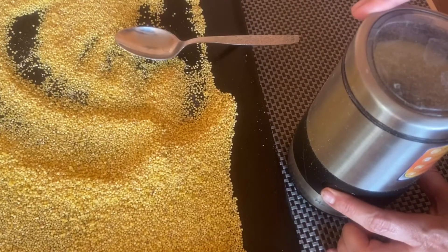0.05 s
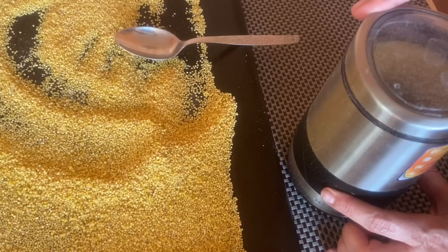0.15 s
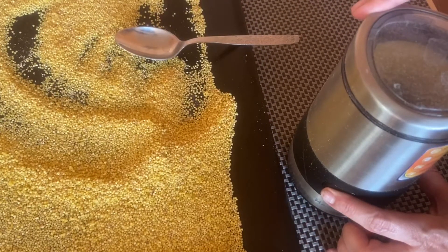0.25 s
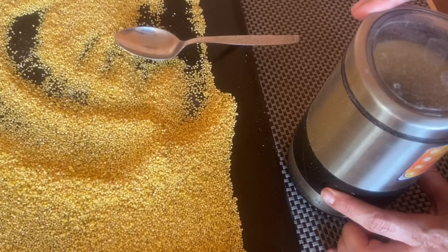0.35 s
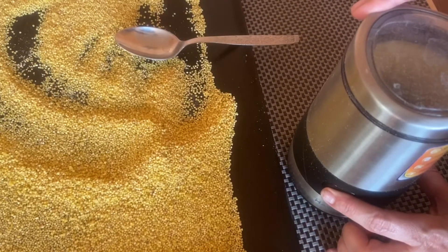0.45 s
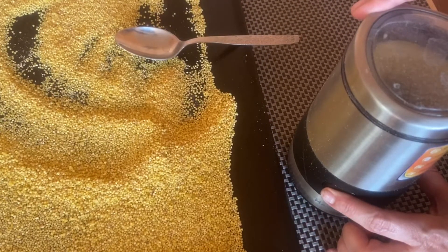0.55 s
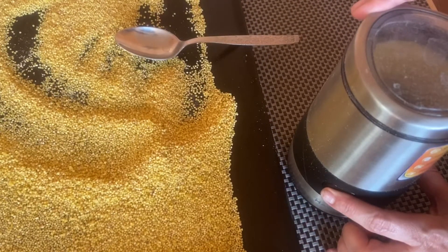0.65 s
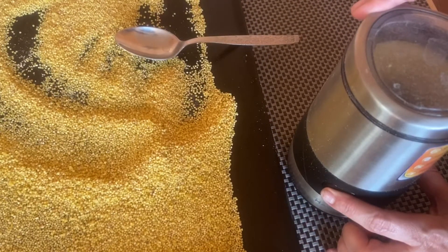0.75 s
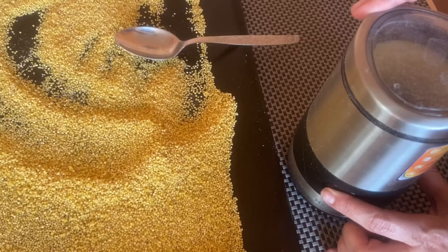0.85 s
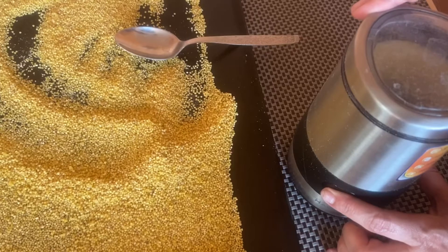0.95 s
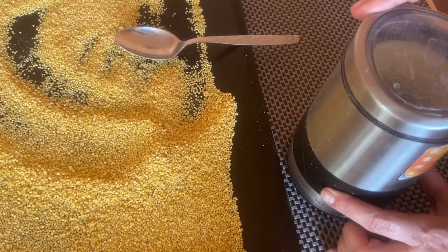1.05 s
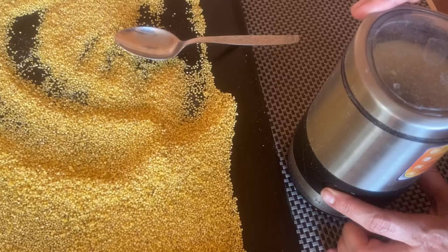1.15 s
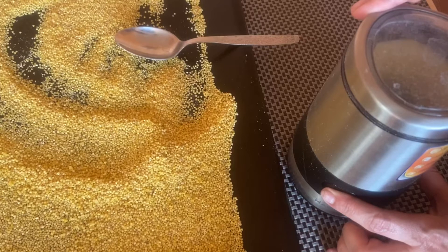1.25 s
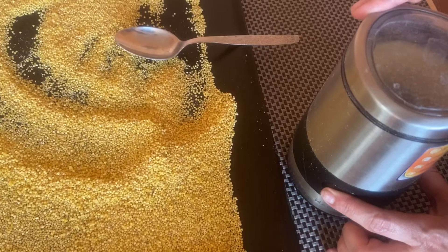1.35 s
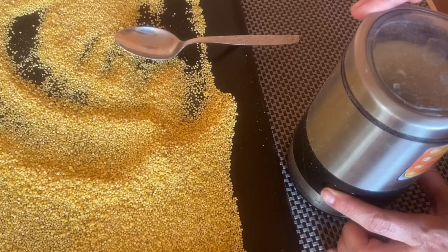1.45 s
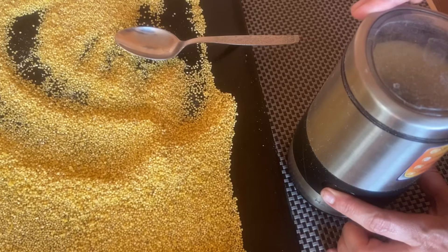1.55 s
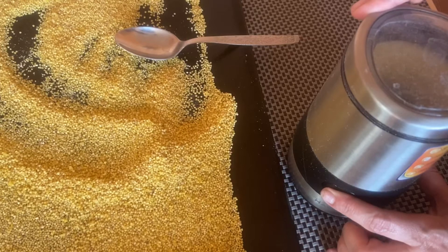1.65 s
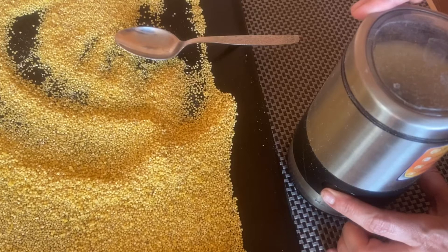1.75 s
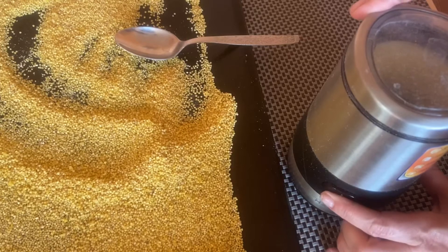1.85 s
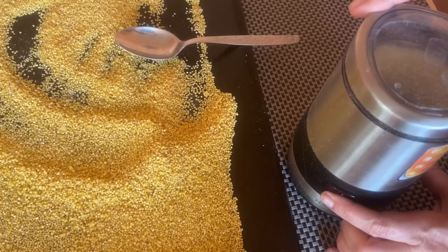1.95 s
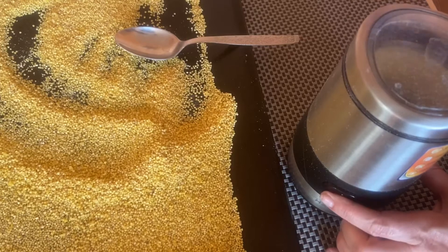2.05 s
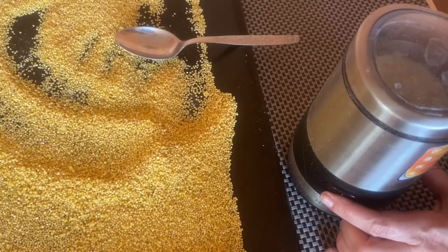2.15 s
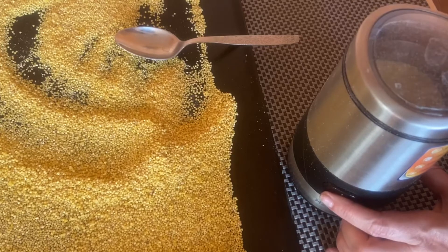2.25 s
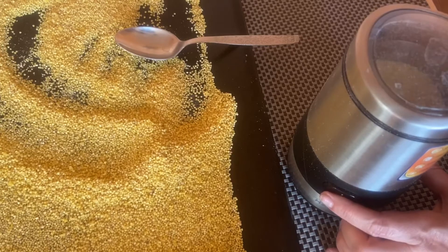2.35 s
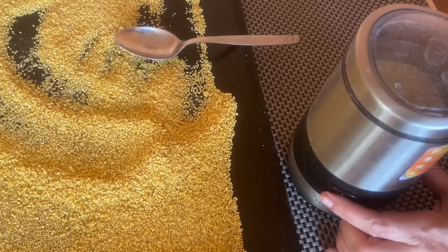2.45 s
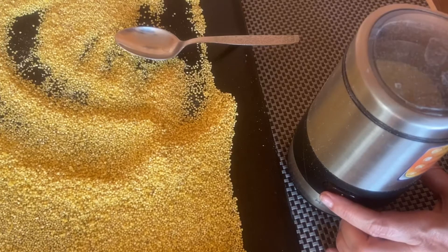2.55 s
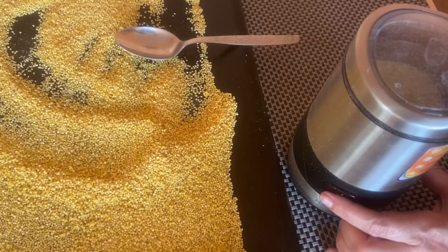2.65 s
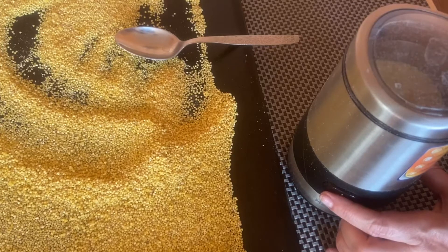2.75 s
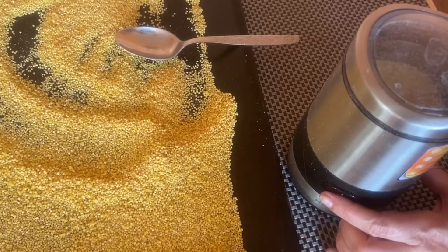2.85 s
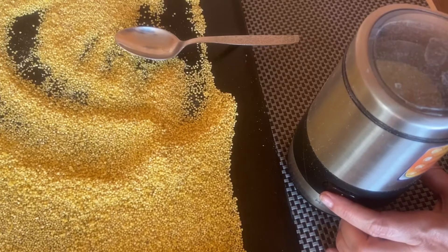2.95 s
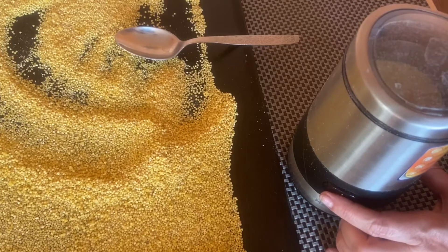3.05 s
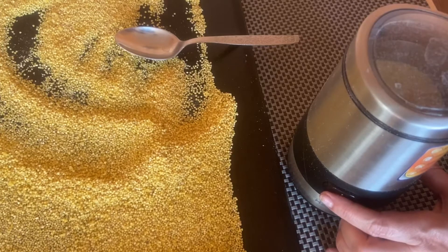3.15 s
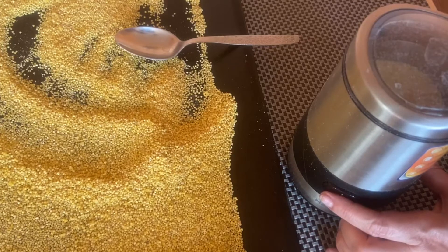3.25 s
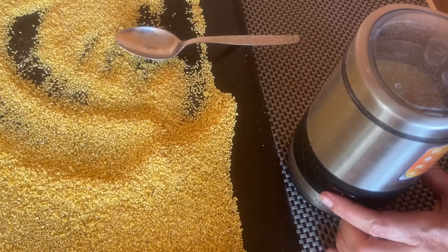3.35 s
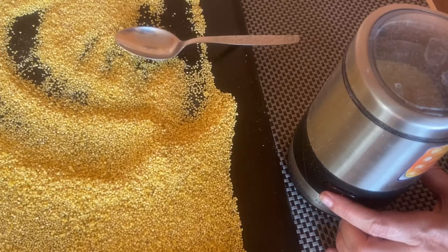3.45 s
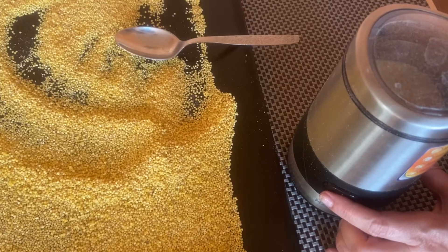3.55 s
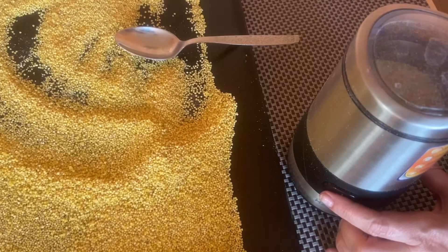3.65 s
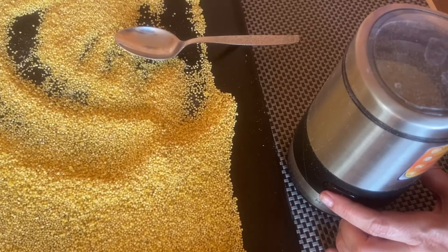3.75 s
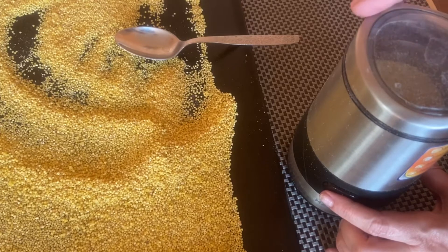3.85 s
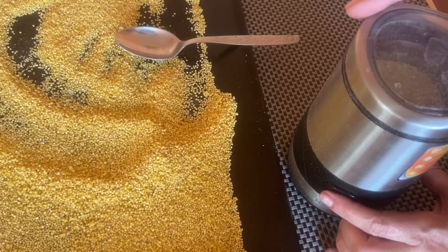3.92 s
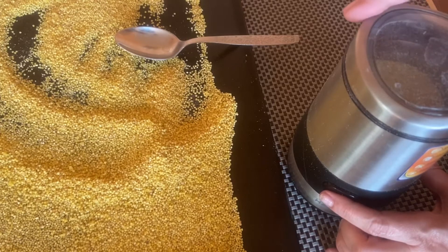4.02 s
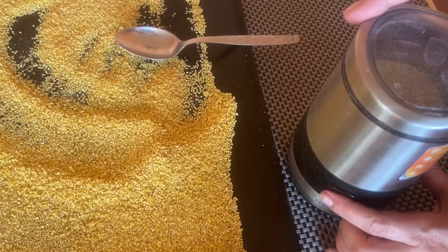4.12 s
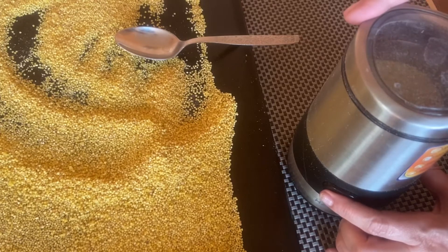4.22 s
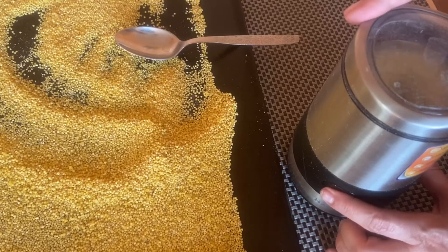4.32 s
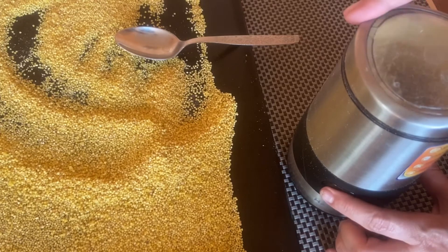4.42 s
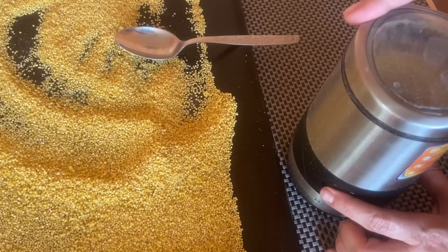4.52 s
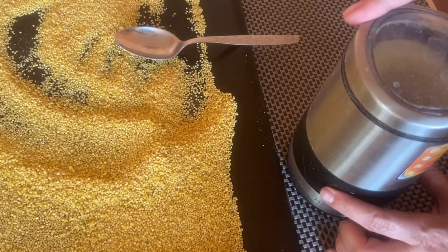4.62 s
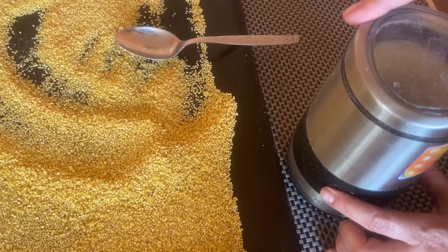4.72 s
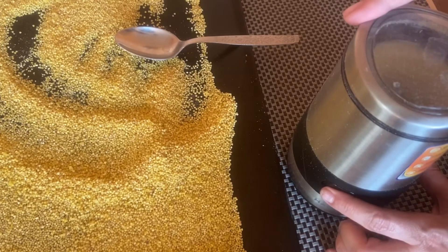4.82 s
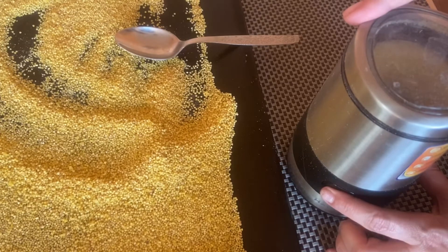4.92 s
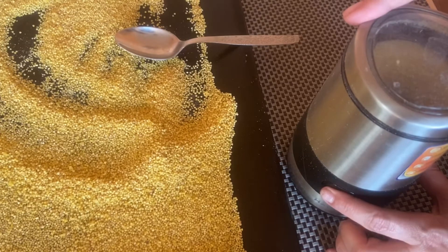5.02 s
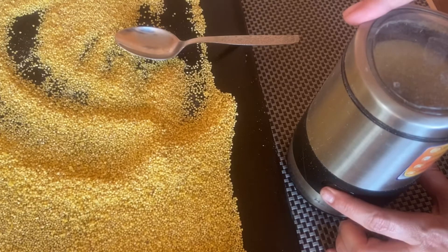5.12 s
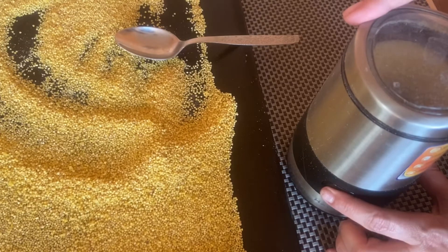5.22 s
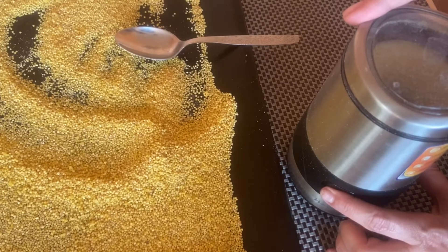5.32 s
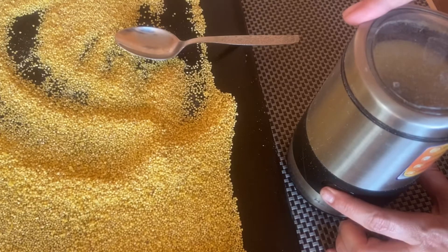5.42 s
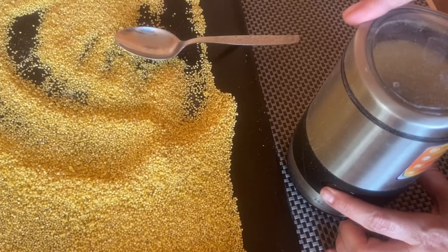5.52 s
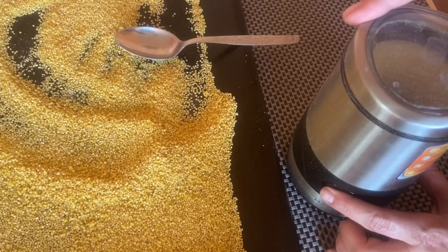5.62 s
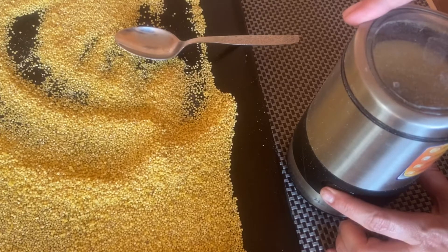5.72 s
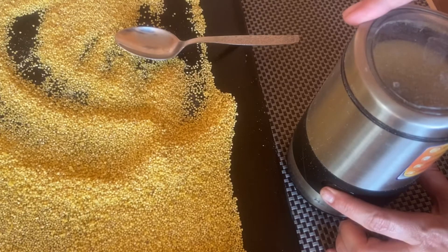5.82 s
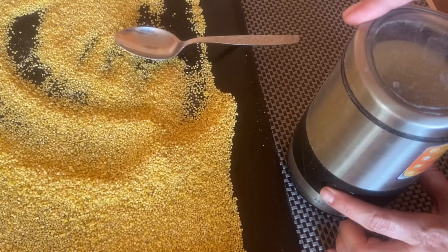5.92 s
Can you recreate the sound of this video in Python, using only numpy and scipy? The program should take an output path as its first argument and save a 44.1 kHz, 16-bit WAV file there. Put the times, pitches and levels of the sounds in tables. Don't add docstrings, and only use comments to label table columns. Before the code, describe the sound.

Loud gritty whirring of a grain grinder winds down with a clatter, leaves a quiet kitchen hush, then restarts abruptly and keeps running.

```python
import sys
import numpy as np
from scipy import signal
from scipy.fft import rfft, irfft, next_fast_len
from scipy.io import wavfile
from scipy.ndimage import uniform_filter1d

SR = 44100
rng = np.random.default_rng(int(sys.argv[2]) if len(sys.argv) > 2 else 0)


def boost(x):
    u = np.asarray(x, float) / 20
    return 10 ** u


def put_to_file(sound):
    columns = np.atleast_2d(sound).T
    safe = np.clip(columns, -1, 1)
    whole_steps = np.round(safe * 32767)
    wavfile.write(sys.argv[1], SR, whole_steps.astype(np.int16))


N = 263444


def evened(x):
    return x / np.sqrt(np.mean(x ** 2) + 1e-20)


def drift(per_s):
    size = round(SR / per_s)
    return evened(uniform_filter1d(uniform_filter1d(rng.standard_normal(N), size), size))


def read(points, hz, column=1):
    table = np.transpose(points)
    return np.interp(np.log(hz + 1), np.log(table[0] + 1), table[column])


def mode(hz, centre_hz, width_hz):
    return 1j * hz * width_hz / (centre_hz ** 2 - hz ** 2 + 1j * hz * width_hz)


def modes(hz, table):
    return sum(boost(db) * mode(hz, centre_hz, width_hz) for centre_hz, width_hz, db in table)


def shaped(x, response):
    size = next_fast_len(N + SR // 2)
    return irfft(rfft(x, size) * response(np.fft.rfftfreq(size, 1 / SR)), size)[..., :N]


def play(pulses, rise_s=0.011):
    t, rows = np.arange(N) / SR, np.vstack(pulses).T
    gate = 0
    for pulse in pulses:
        start_s, end_s = pulse[0][0], pulse[-1][0]
        opens = np.clip((t - start_s) / rise_s + (start_s < .1), 0, 1)
        shuts = np.clip((end_s - t) / .03 + (end_s > 5), 0, 1)
        gate = gate + opens * shuts
    return gate, *(np.interp(t, rows[0], curve) for curve in rows[1:])


# frequency in Hz, right port's lead in radians, left-right likeness.
PORT_PHASE = [(60, 0, .98), (520, .1, .9), (1000, -.3, .3), (1450, .8, .65), (2300, 0, .86), (3050, .8, .3),
              (3700, 0, .9), (4700, -.4, .84), (5450, -2.8, .6), (6050, -.4, .82), (7350, .3, .92),
              (8480, 2.7, .97), (9700, 3.85, .96), (10800, 6.1, .95)]


def ports(a, b, same):
    like = lambda hz: np.clip(same(hz), 0, 1)
    shared = shaped(a, lambda hz: like(hz) * np.exp(1j * read(PORT_PHASE, hz)))
    own = shaped(b, lambda hz: np.sqrt(1 - like(hz) ** 2))
    return np.array([a, shared + own])


def close_ports(a, b):
    return ports(a, b, lambda hz: read(PORT_PHASE, hz, column=2))


# time in seconds, depth in dB.
GRIP_SLIPS = [
    (.305, 22),
    (.645, 26),
    (.985, 26),
    (1.32, 12),
    (1.5, 7),
    (1.7, 7),
    (5.405, 24),
    (5.62, 8),
    (5.9, 10),
]


def slips():
    slip_s, regrip_s, settle_s, settle_share = .012, .016, .08, .12
    s, depth_db = np.transpose(GRIP_SLIPS)
    age = np.arange(N) / SR - s[:, None]
    after = np.maximum(age, 0)
    back = (1 - settle_share) * np.exp(-after / regrip_s) + settle_share * np.exp(-after / settle_s)
    return depth_db @ (back * np.exp(np.minimum(age, 0) / slip_s))


# time in seconds, speed in Hz.
SHAFT_SPEED = [
    [(0, 241.5), (1.1, 244.3), (1.81, 243.5), (1.85, 208), (1.885, 196), (1.99, 112), (2.2, 5)],
    [(4.34, 94.77), (4.363, 110), (4.449, 194.9), (4.485, 212.3), (4.543, 220.8), (4.66, 226.6),
     (4.72, 237.4), (4.9, 244.8), (5.974, 247.2)],
]
# time in seconds, level in dB.
GRAIN_CHURN = [
    [(0, -22), (.8, -22), (1.3, -23), (1.8, -23), (1.86, -27.5), (1.95, -26), (2.07, -30.5), (2.1, -39),
     (2.2, -57)],
    [(4.338, -24), (4.35, -24.5), (4.43, -28.5), (4.45, -24.5), (4.48, -24), (4.525, -20), (4.6, -21.5),
     (5.2, -21), (5.974, -21)],
]


def slowness():
    full_hz = 245
    return np.clip(1 - play(SHAFT_SPEED)[1] / full_hz, 0, 1)


def shaft():
    gate, hz = play(SHAFT_SPEED)
    usual_churn_db = -22.5
    load_db = np.clip(uniform_filter1d(play(GRAIN_CHURN)[1], size=SR // 5) - usual_churn_db, -1.5, 1.5)
    swallow_db, knee_hz, knee_width_hz = 25, 190, 12
    once_db = -32.5 + 0.89 * load_db - swallow_db / (1 + np.exp((hz - knee_hz) / knee_width_hz))
    twice_db = -27 + 1.1 * load_db - slips()
    turns = 2 * np.pi * np.cumsum(hz * (1 + .003 * drift(per_s=22.0))) / SR
    port_phase = np.array([[0], [.35]])
    once = boost(once_db + 0.61 * drift(per_s=31.0)) * np.sin(turns + port_phase)
    wobble = 0.41 * drift(per_s=40.)
    twice = boost(twice_db + 1.1 * drift(per_s=35.0)) * np.sin(2 * turns + port_phase + wobble)
    cup_hz, cup_half_width_hz = 488, 17
    twice = twice / np.sqrt(1 + ((2 * hz - cup_hz) / cup_half_width_hz) ** 4)
    return np.sqrt(2) * gate * (once * boost([[-1.6], [1.5]]) + twice * boost([[-1.8], [1.7]])), turns


# frequency in Hz, width in Hz, level in dB.
TABLE_BOOM = [(137, 7, 7.5), (206, 12, 3), (90, 14, 6.5)]


def table_boom(hum):
    return shaped(hum, lambda hz: modes(hz, TABLE_BOOM))


def strikes(turns, per_s=14000., spread_db=2.5):
    hits = rng.random(N) < per_s / SR
    size = boost(spread_db * np.minimum(rng.exponential(1, N), 5)) * rng.choice([-1., 1.], N)
    return evened(hits * size * (1 + .07 * np.sin(turns)))


def patchy(x, patchy_db=1.27):
    z = signal.stft(x, nperseg=512)[2]
    field = uniform_filter1d(rng.standard_normal(z.shape[1:]), size=5, axis=0)
    field = uniform_filter1d(field, size=9, axis=1)
    return signal.istft(z * boost(patchy_db * evened(field)), nperseg=512)[1][:, :N]


# frequency in Hz, level in dB.
STRIKE_COLOUR = [(40, -23.5), (150, -14), (300, -12.5), (900, -2), (1150, -5.5), (1500, 1.5), (2100, -0.5),
                 (2900, -1.5), (4600, -4.5), (6300, 1.5), (8100, 2.5), (9000, -3), (11000, -4.5),
                 (12000, -8)]
# frequency in Hz, width in Hz, level in dB.
CUP_MODES = [(1317, 31, 8), (1428, 27, 4.5), (1535, 57, -0.5), (1723, 67, 2.5), (1948, 110, -2),
             (2140, 26, -3.5), (4069, 110, -1), (4870, 130, -5.5), (8170, 210, 2), (9600, 100, -8.5),
             (10720, 1600, -6)]
# frequency in Hz, width in Hz, level in dB.
BASE_MODES = [(56.8, 40, -1), (97, 70, -10), (205, 16, 1), (497, 20, 3.5), (516, 16, 10.5), (440, 25, -7.5),
              (637, 14, 7), (682, 16, 16)]


def grain(turns):
    (gate, churn_db), slow = play(GRAIN_CHURN), slowness()
    bright_db = 2 + 7 * slow - 29 * slow ** 3
    gain_per_s = -np.gradient(uniform_filter1d(slow, size=SR // 10)) * SR
    weight_db = -7 + 10.5 * slow - np.clip(gain_per_s / 0.096, 0, 1)
    waves = gate * boost(churn_db + .4 * drift(per_s=16.) + .9 * drift(per_s=90.))
    hits = waves * np.array([strikes(turns), strikes(turns)])
    cup = lambda hz: boost(read(STRIKE_COLOUR, hz)) + modes(hz, CUP_MODES)
    top = lambda hz: 1 / (1 + (4500 / (hz + 1)) ** 4)
    body = shaped(hits, lambda hz: cup(hz) * (1 - top(hz)))
    bright = shaped(hits * boost(bright_db + 0.25 * drift(per_s=46.0)), lambda hz: cup(hz) * top(hz))
    low = shaped(hits * boost(weight_db + 2.0 * drift(per_s=6.9)), lambda hz: modes(hz, BASE_MODES))
    return boost(4.0) * close_ports(*patchy(body + bright + low))


# frequency in Hz, width in Hz, level in dB.
KNOCK_MODES = [(110, 46, -9), (137.8, 5.9, 16.5), (340, 57, -2.5), (475, 14.4, 8), (1050, 73, -6),
               (1056, 470, 3), (626, 58, 5), (2830, 180, 0.5)]


def tumble(turns):
    gate, churn_db = play(GRAIN_CHURN)
    loose = boost(churn_db - 2) * np.maximum(slowness() - 0.03, 0) ** 0.87
    knocks = np.array([strikes(turns, per_s=1800., spread_db=3.5),
                       strikes(turns, per_s=1700.0, spread_db=4.0)])
    rattle = shaped(gate * loose * knocks, lambda hz: modes(hz, KNOCK_MODES))
    return boost(12.5) * close_ports(*rattle)


# time in seconds, peak in dB, ring in Hz, t60 in seconds.
STRAY_TICKS = [(2.0735, -21, 3750, .014), (2.0735, -21, 1750, .016), (4.277, -52, 1800, .05),
               (4.277, -54, 1550, .05), (4.277, -58, 2550, .04), (4.278, -64, 5200, .03),
               (4.278, -66, 6900, .02), (4.278, -62, 900, .04), (4.3, -52, 330, .09),
               (4.347, -26, 1330, .5), (4.366, -26, 690, .3), (4.358, -26, 590, .2),
               (4.442, -22, 4030, .04), (4.526, -17, 1900, .03)]
# time in seconds, peak in dB, ring in Hz, t60 in seconds.
BASE_THUDS = [
    (1.84, -36, 490, .15),
    (1.9, -33, 490, .2),
    (2.0, -35, 488, .3),
    (2.085, -48, 137, .9),
    (4.352, -32, 108, .3),
    (4.347, -33, 335, .12),
    (4.53, -30, 450, .15),
]


def rings():
    t, out = np.arange(N) / SR, np.zeros(N)
    for s, db, hz, t60_s in [*STRAY_TICKS, *BASE_THUDS]:
        age = np.maximum(t - s, 0)
        fade = boost(db - 60 * np.minimum(age / t60_s, 4.))
        out += fade * np.sin(2 * np.pi * hz * age) * np.minimum(age / 0.0004, 1)
    return out


# time in seconds, peak in dB, t60 in seconds.
DRY_CLICKS = [(1.945, -21, 0.016), (1.98, -22, .012), (4.7, -21, .015), (2.0745, -29, 0.0079),
              (3.856, -71, .09), (3.84, -70, 0.097), (3.93, -75, .2), (4.277, -60, .03),
              (4.305, -67.5, 0.2), (4.344, -32, 0.026), (4.526, -23, 0.012)]


def clicks():
    t, out = np.arange(N) / SR, np.zeros(N)
    dry_noise = evened(shaped(rng.standard_normal(N), lambda hz: mode(hz, 2400, 4500) ** 2))
    for s, db, t60_s in DRY_CLICKS:
        fade = boost(db - 60 * np.clip((t - s) / t60_s, 0, 3))
        out += fade * np.clip((t - s) / .003, 0, 1) * dry_noise
    return out


# start in seconds, end in seconds, frequency in Hz, width in Hz, level in dB.
FINGER_SQUEAK = (3.92, 4.03, 3720, 260, -77)


def squeak():
    start_s, end_s, centre_hz, width_hz, db = FINGER_SQUEAK
    rub = evened(shaped(rng.standard_normal(N), lambda hz: mode(hz, centre_hz, width_hz) ** 2))
    stroke = np.clip((np.arange(N) / SR - start_s) / (end_s - start_s), 0, 1)
    return boost(db) * rub * np.sin(np.pi * stroke)


# frequency in Hz, t60 in seconds.
KITCHEN_T60 = [(120, 0.99), (500, 0.56), (2000, .58), (6000, .56), (12000, 0.43)]


def kitchen(x):
    taps = np.zeros(SR)
    at = np.arange(200, SR - 20, 20)
    taps[at + rng.integers(0, 20, len(at))] = rng.choice([-1., 1.], len(at))
    hz, t, z = signal.stft(taps, SR, nperseg=256)
    tail = signal.istft(z * boost(-60 * t / read(KITCHEN_T60, hz)[:, None]), SR, nperseg=256)[1]
    tail = tail / np.linalg.norm(tail)
    lead_in = SR // 2
    source = np.hstack([x[:, lead_in:0:-1], x])
    return signal.fftconvolve(source, tail[None], axes=1)[:, lead_in:lead_in + N]


# frequency in Hz, level in dB per Hz.
HUSH_COLOUR = [(18, -29), (30, -2.5), (60, -0.5), (130, -12.5), (260, -13.5), (450, -22.5), (700, -30),
               (1000, -32.5), (1600, -36.5), (4000, -44), (8000, -50), (11000, -54.5)]
# frequency in Hz, width in Hz, level in dB.
APPLIANCE_HUMS = [(137, 28, -65.5), (198, 31, -58), (597, 17, -74), (397, 600, -75.5)]
# frequency in Hz, left-right likeness.
HUSH_LIKENESS = [(60, 1), (230, 0.55), (860, 0.1), (3260, 0.18), (6000, .2), (7400, .9), (12300, 0.92)]


def hush():
    noise = rng.standard_normal((2, N))
    out = boost(-55.5) * evened(shaped(noise, lambda hz: boost(read(HUSH_COLOUR, hz))))
    for centre_hz, width_hz, db in APPLIANCE_HUMS:
        out = out + boost(db) * evened(shaped(noise, lambda hz: mode(hz, centre_hz, width_hz) ** 2))
    return ports(*out, lambda hz: read(HUSH_LIKENESS, hz)) * boost([[-.4], [.4]])


def scene():
    hum, turns = shaft()
    hum = hum + table_boom(hum)
    near = grain(turns) + tumble(turns) + rings() + clicks() + squeak()
    return hum + near + boost(-12) * kitchen(near + 0.33 * hum) + hush()


def low_pass(x):
    return signal.sosfilt(signal.butter(12, 12930, fs=SR, output="sos"), x)


def record(dry):
    thinned = shaped(dry, lambda hz: hz ** 2 / (hz ** 2 + 35 ** 2))
    return low_pass(thinned)


dry = scene()
out = record(dry)
put_to_file(out)
```